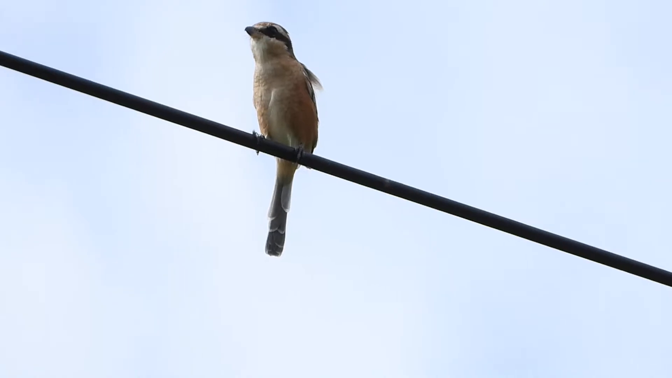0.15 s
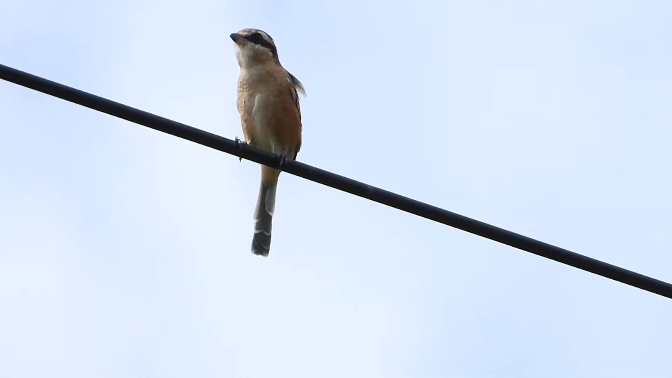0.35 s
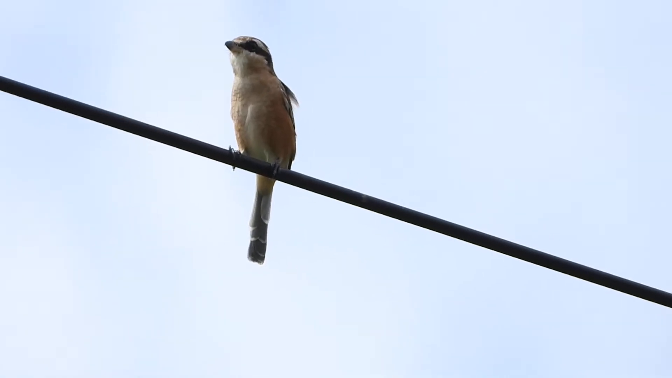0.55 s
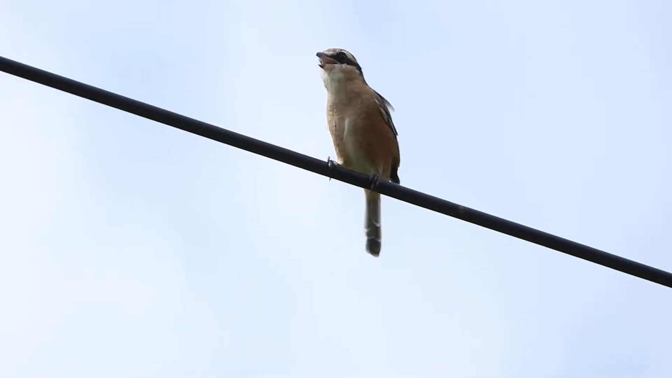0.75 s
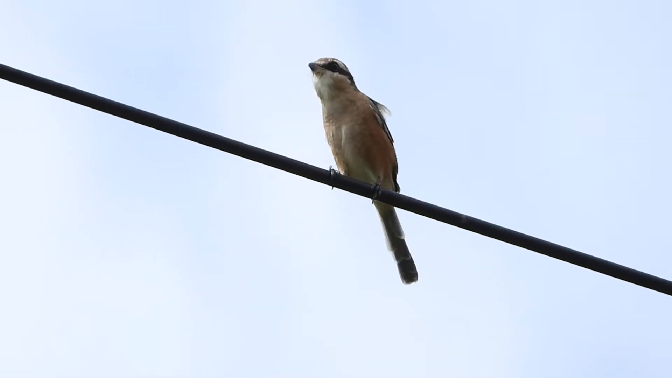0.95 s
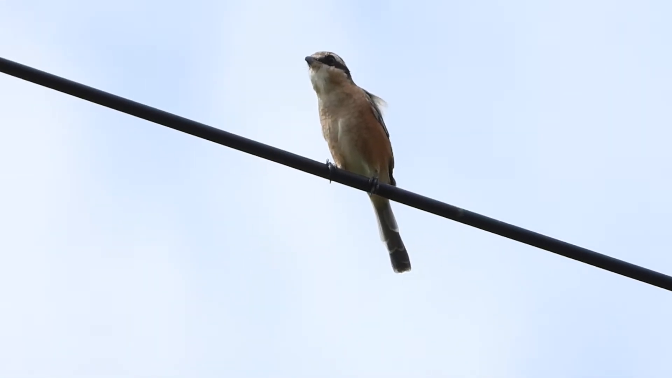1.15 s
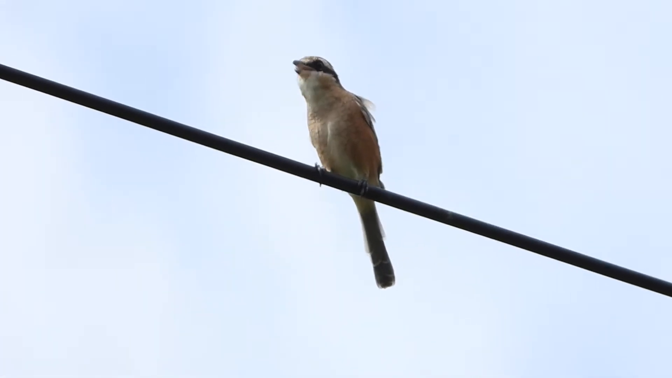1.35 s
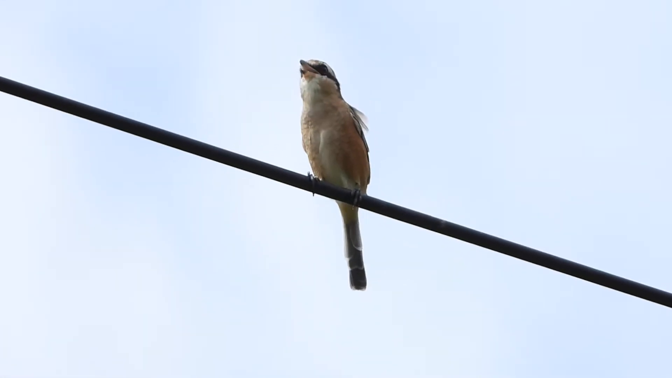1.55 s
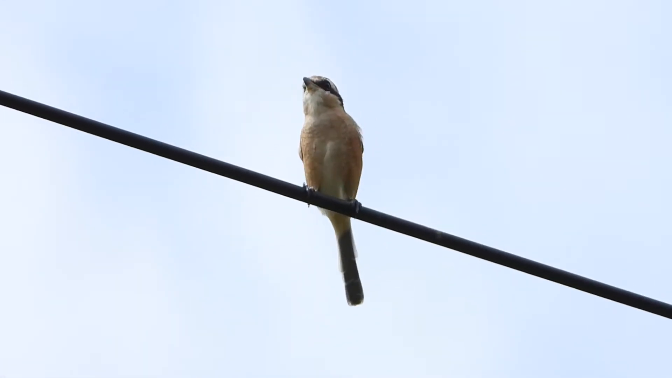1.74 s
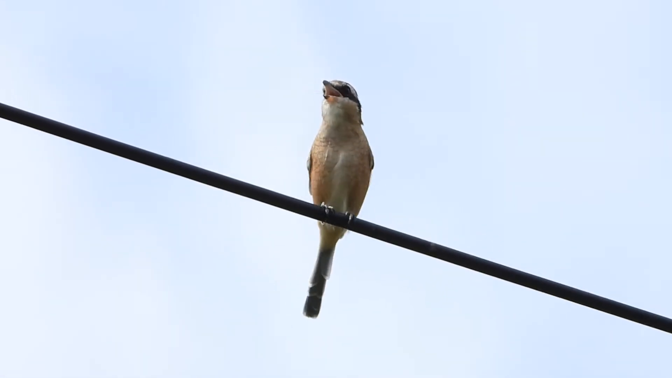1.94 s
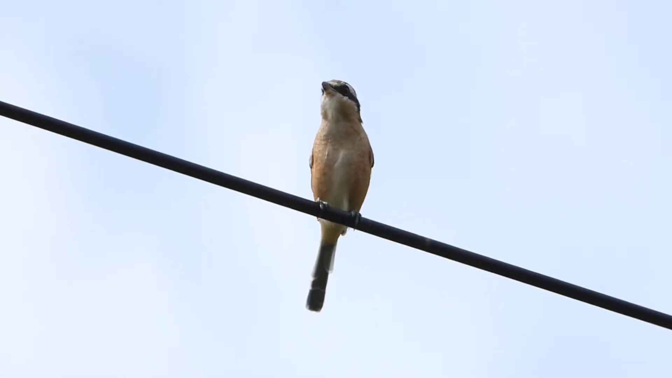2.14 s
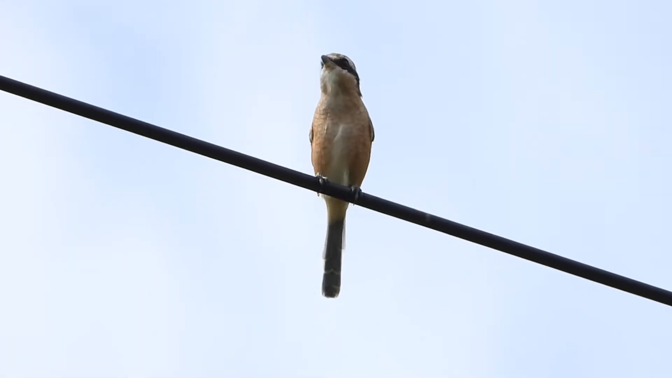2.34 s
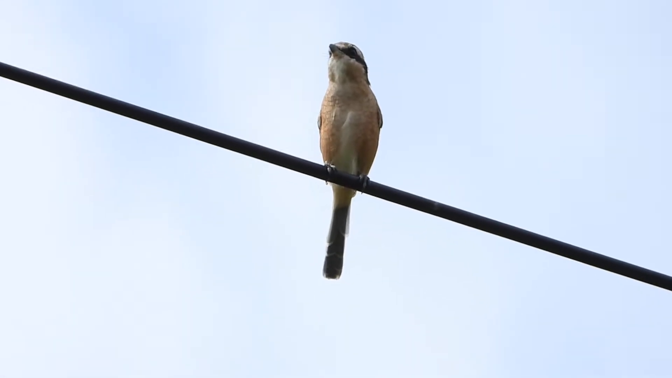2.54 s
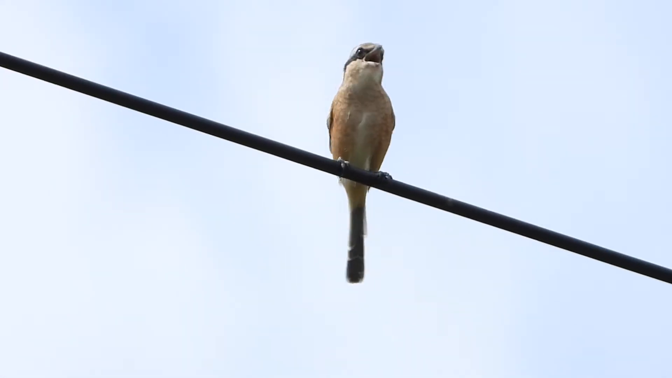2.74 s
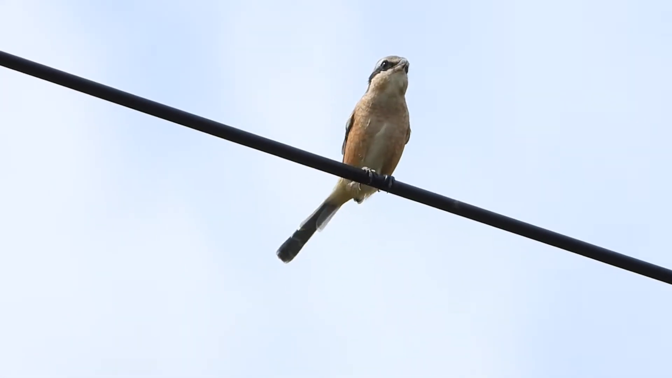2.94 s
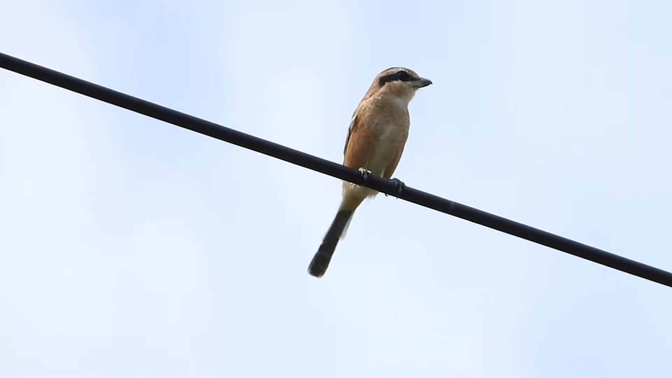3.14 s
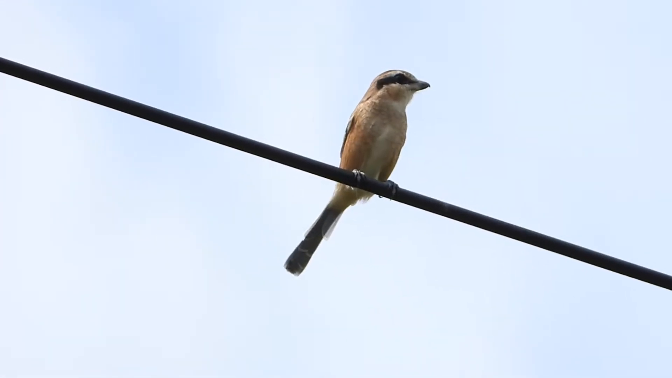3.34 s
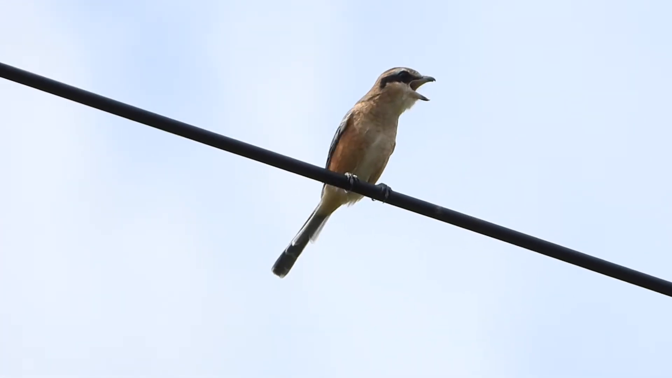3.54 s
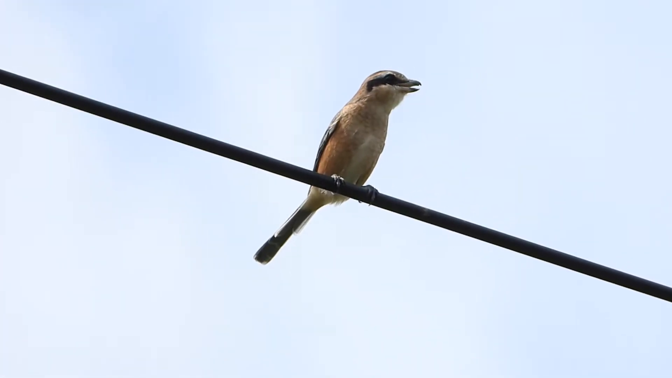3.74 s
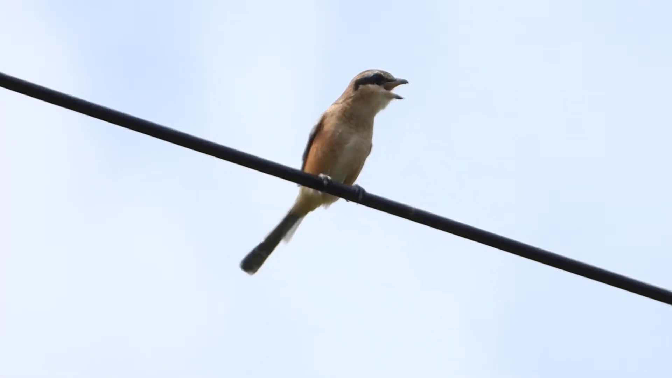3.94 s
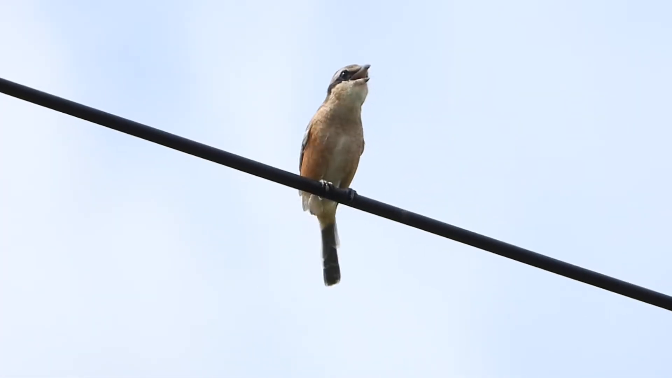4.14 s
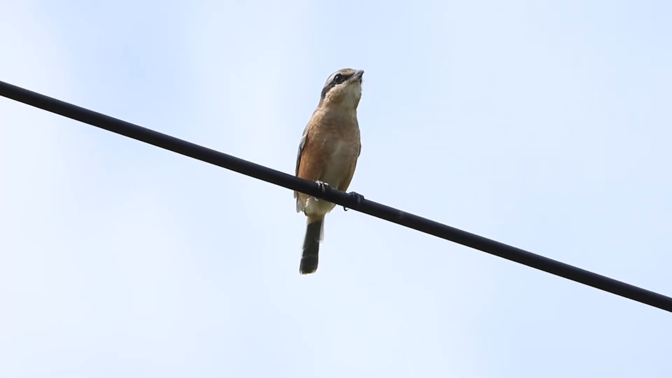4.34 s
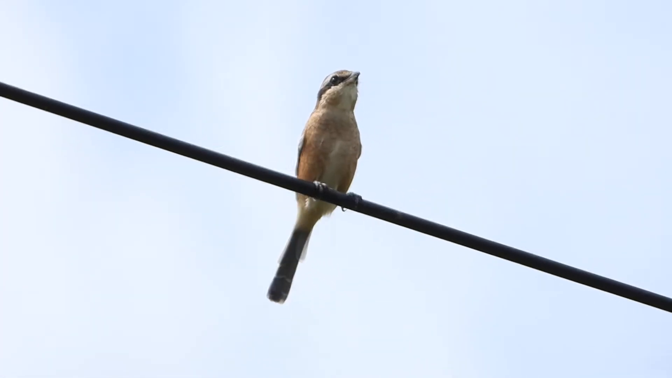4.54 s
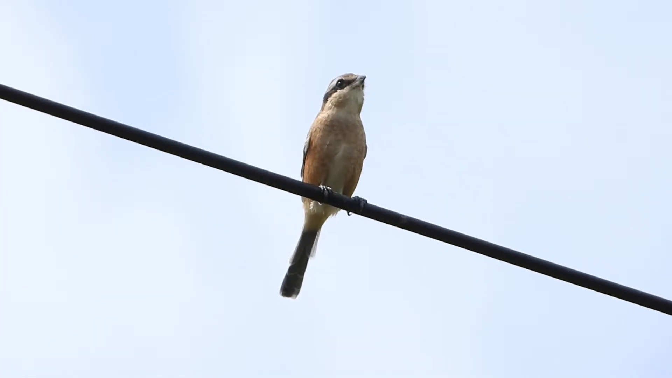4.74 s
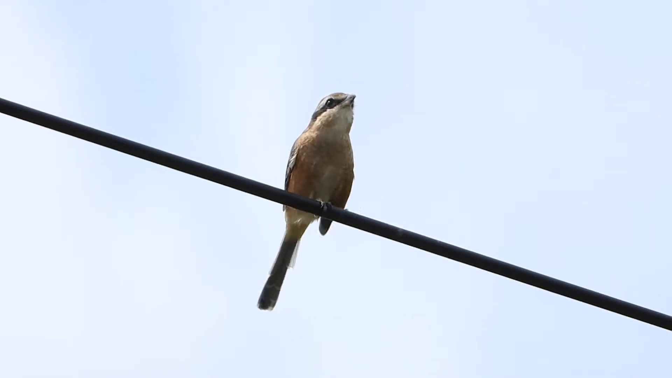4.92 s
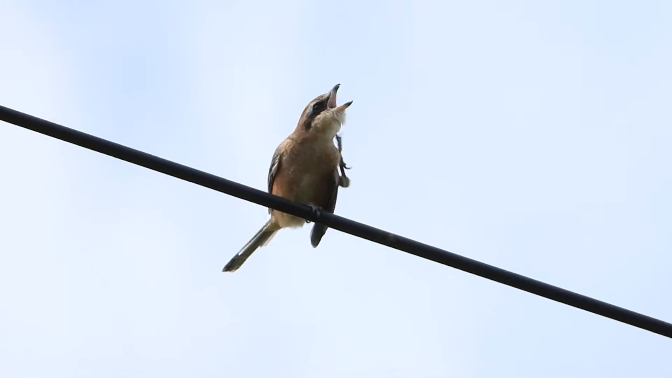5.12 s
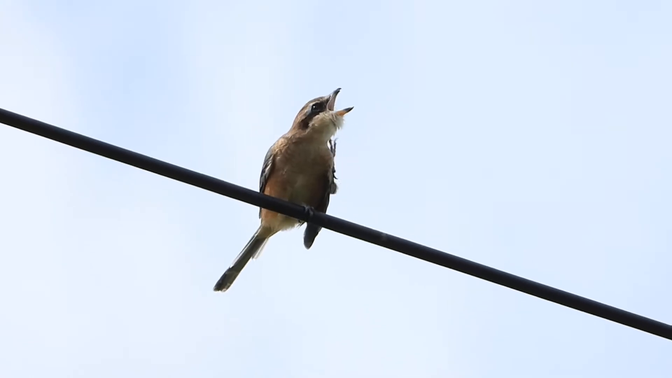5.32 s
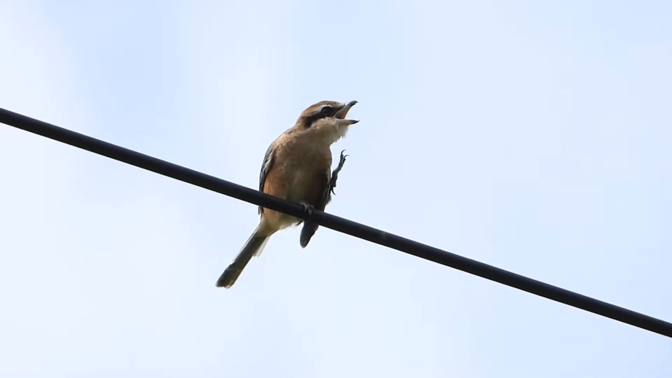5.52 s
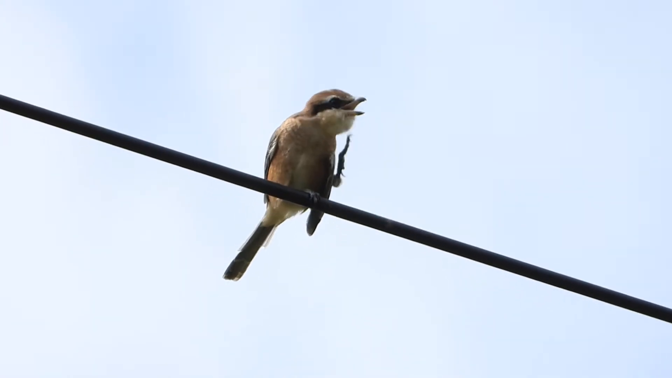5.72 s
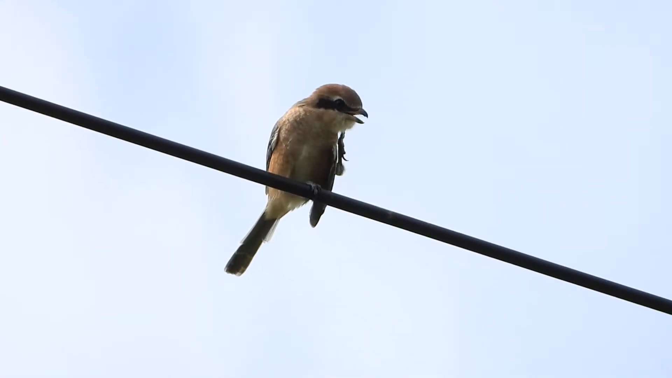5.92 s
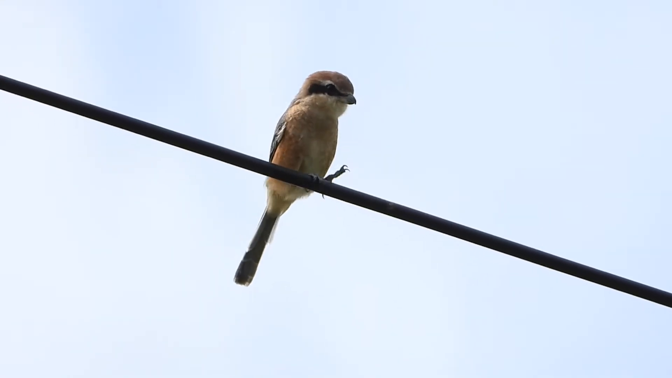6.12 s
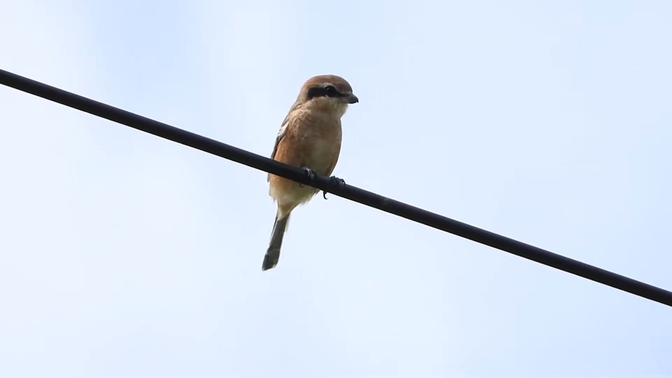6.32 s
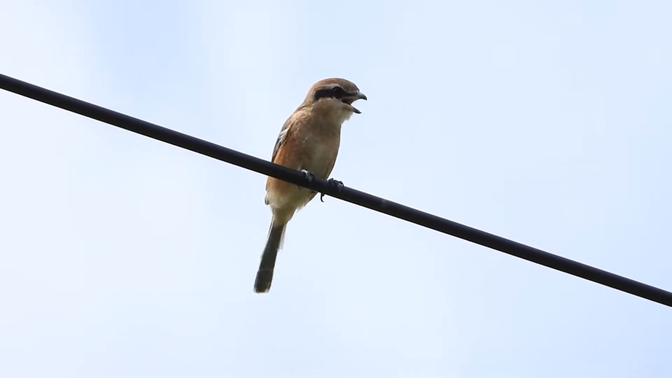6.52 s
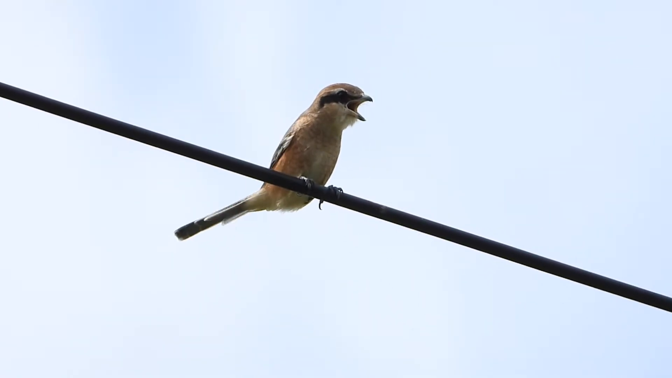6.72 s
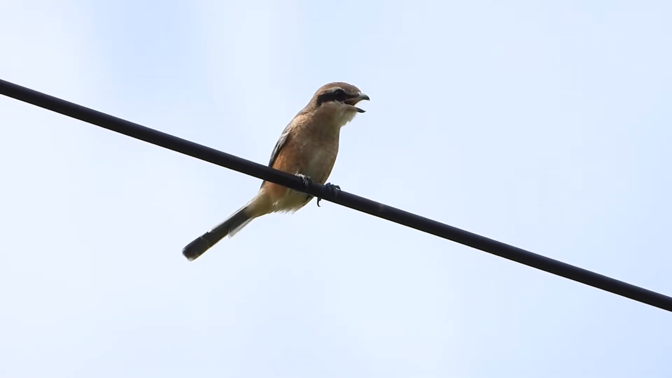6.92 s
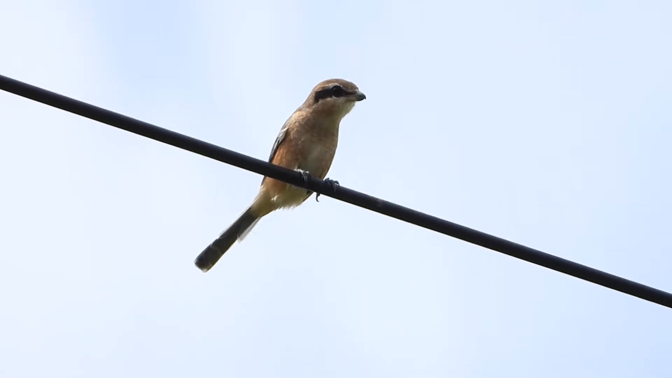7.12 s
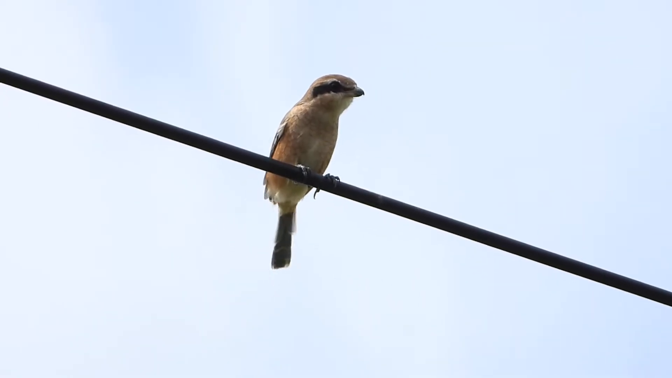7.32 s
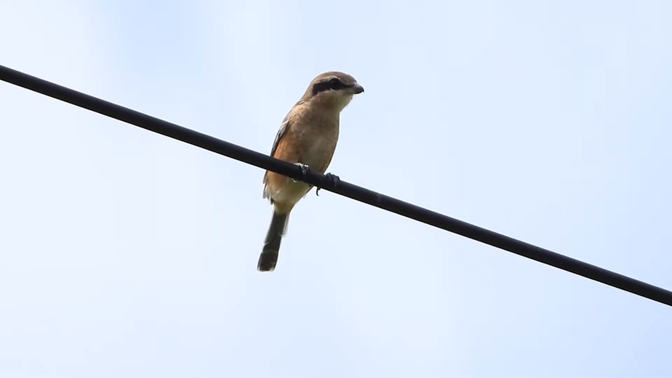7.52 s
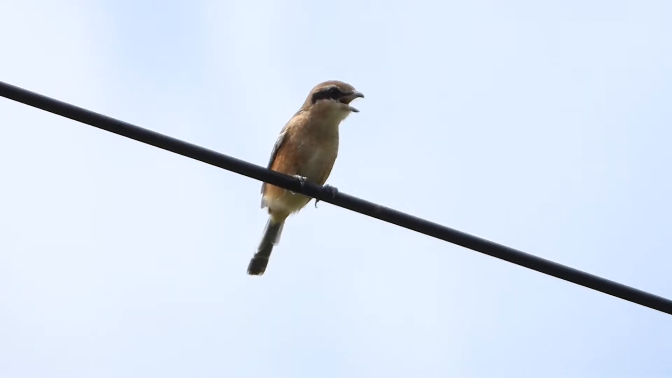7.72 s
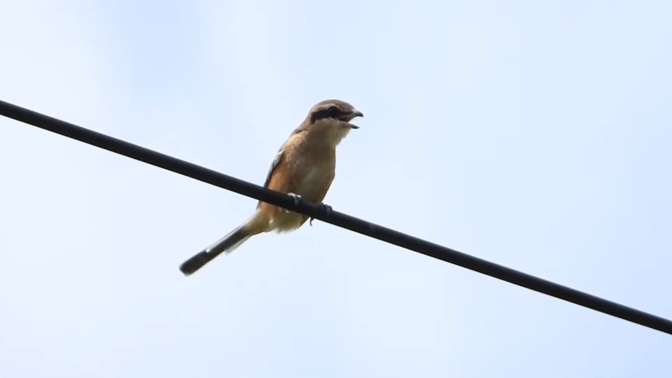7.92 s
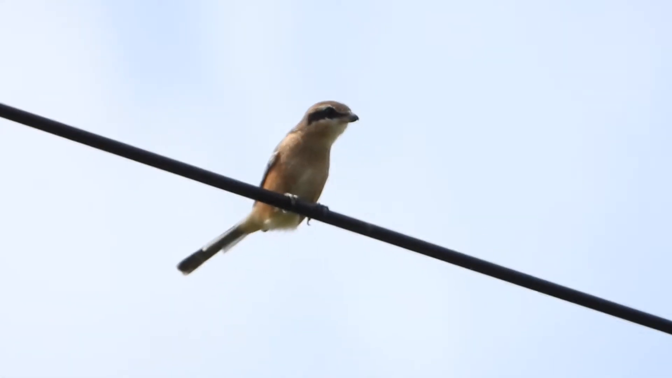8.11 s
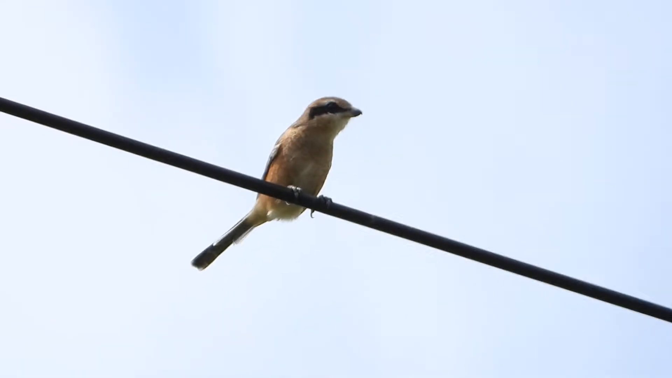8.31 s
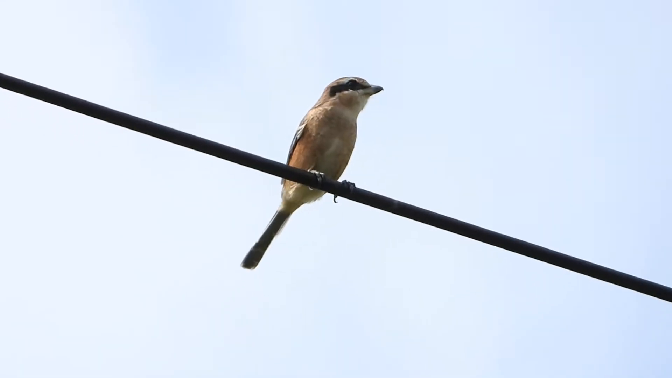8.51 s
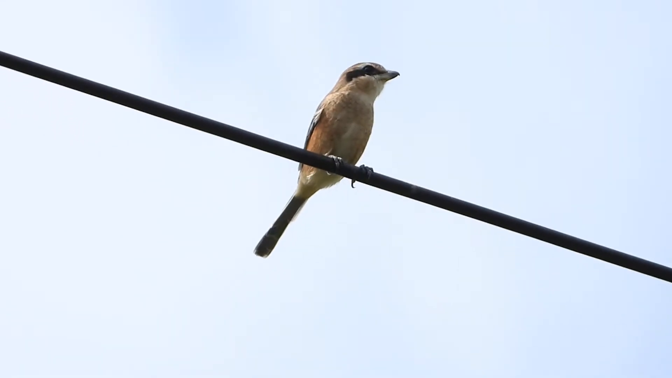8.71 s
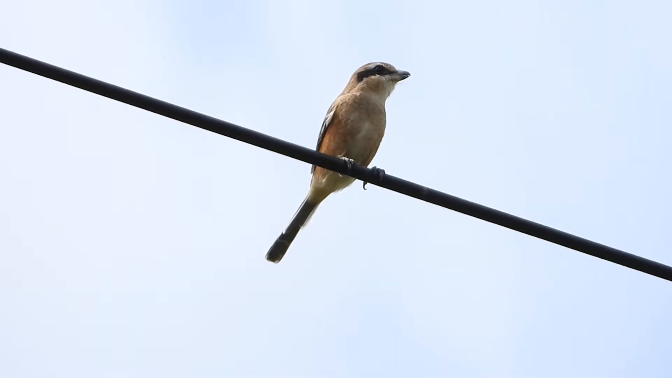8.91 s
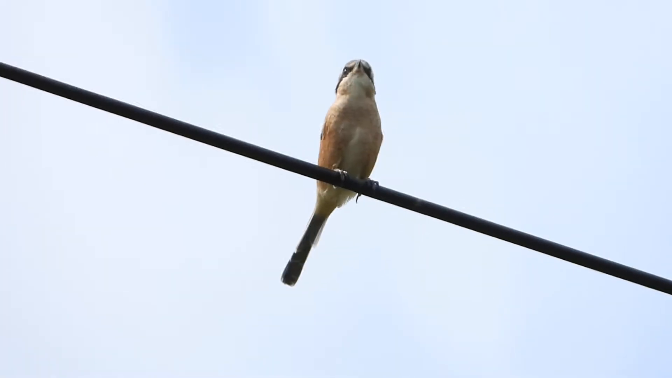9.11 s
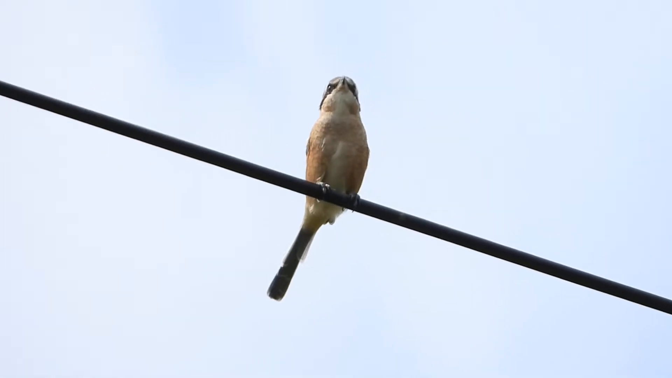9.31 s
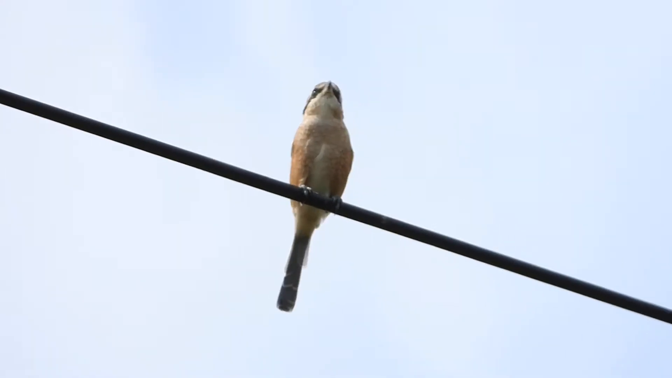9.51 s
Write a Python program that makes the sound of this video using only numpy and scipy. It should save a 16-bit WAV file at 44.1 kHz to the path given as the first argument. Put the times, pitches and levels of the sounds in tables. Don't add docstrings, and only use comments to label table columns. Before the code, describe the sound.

Stereo outdoor roadside ambience with a constant high cicada buzz and soft far-off traffic and motor hum. After faint hoots from another bird, a single shrike calls sparsely: short fluttering whines and piercing, downward chips, sometimes doubled or in a fast burst, with scattered reflections. Low wind rumble comes and goes around the microphone, with one stronger puff past eight seconds.

```python
import sys
import numpy as np
from scipy import signal
from scipy.fft import rfft, irfft, next_fast_len
from scipy.io import wavfile
from scipy.ndimage import uniform_filter1d

SR = 44100
rng = np.random.default_rng(int(sys.argv[2]) if len(sys.argv) > 2 else 0)


def pcm_store(signal):
    levels = np.round(np.clip(np.atleast_2d(signal), -1, 1) * 32767)
    wavfile.write(sys.argv[1], SR, levels.astype(np.int16).T)


def voltage_ratio(decibels):
    exponent = np.asarray(decibels, float) / 20
    return 10 ** exponent


N = 421596
TIME = np.arange(N) / SR
LR = np.array([[1], [-1]])


def level(x, db):
    return x * voltage_ratio(db) / np.sqrt(np.mean(x ** 2))


def on_log(table, hz):
    knots_hz, db = np.transpose(table)
    return np.interp(np.log(hz), np.log(knots_hz), db)


def band(x, hz, width_hz, order=1):
    edges = [hz - width_hz / 2, min(hz + width_hz / 2, 0.49 * SR)]
    return signal.sosfilt(signal.butter(order, edges, "band", fs=SR, output="sos"), x)


def walk(rate):
    steps = rng.standard_normal(N // 100)
    return 1.2 * np.interp(TIME * rate, np.arange(len(steps)), steps)


def pan(db):
    return voltage_ratio(LR * db / 2)


def add(out, s, x):
    i = int(s * SR)
    out[i:i + len(x)] += x


# f/Hz, side minus mid level/dB
WIDTH = [(60, -14), (110, -14), (200, -8.5), (380, -7.5), (700, -11), (1290, -9), (2380, -6.5), (4400, -3),
         (8120, -5), (15000, -1)]


def distant(spectrum, flicker_db, flicker_rate):
    size = next_fast_len(N)
    hz = np.maximum(np.fft.rfftfreq(size, 1 / SR), 1)
    low_hz, high_hz = spectrum[0][0], spectrum[-1][0]
    colour = voltage_ratio(on_log(spectrum, hz)) * (hz > low_hz) * (hz < high_hz)
    mid, side = rfft(rng.standard_normal((2, size))) * colour
    both = mid + LR * side * voltage_ratio(on_log(WIDTH, hz))
    octave = np.log2(hz / low_hz)
    out = 0
    for k in range(int(np.log2(high_hz / low_hz)) + 2):
        share = np.cos(np.pi / 2 * np.clip(octave - k, -1, 1)) ** 2
        out = out + irfft(both * share)[:, :N] * voltage_ratio(flicker_db * walk(flicker_rate))
    return level(out, 0)


# f/Hz, level/dB per Hz
TRAFFIC = [(59, -53), (100, -29), (184, -8.5), (402, -6.5), (449, -3.5), (729, -0.5), (1200, -1.5),
           (1920, -5.5), (3070, -9), (3880, -11.5), (4200, -7.5), (5460, -7.5), (9240, -120)]


def traffic():
    return distant(TRAFFIC, 1.92, 9)


# f/Hz, level/dB
MOTOR_HUMS = [(197, -71.5), (300, -68), (365, -66), (435, -64), (520, -66), (600, -60.5), (710, -59.5),
              (830, -59.5), (960, -61.5), (1150, -62.5), (1400, -61.5), (1700, -70)]


def motors():
    out = 0
    for hz, db in MOTOR_HUMS:
        waver = 1 + 0.04 * walk(1.2) + 0.01 * walk(30)
        turn = 2 * np.pi * np.cumsum(hz * waver) / SR
        out = out + voltage_ratio(db - 2.0 + 11.9 * np.tanh(1.22 * walk(19))) * np.sin(turn)
    return out


# t/s, half length t/s, level/dB
GUSTS = [(1.6, .9, -77), (2.7, 0.071, -80), (3.2, .25, -80), (3.83, 0.29, -70), (4.97, .2, -79),
         (5.75, .5, -67.5), (7.49, .25, -79), (8.06, 0.43, -65.5), (8.7, .15, -73), (9.1, .2, -73),
         (9.3, .12, -64), (9.56, .2, -69)]


def wind():
    start_s, rise_s, hold_s, fall_s = 8.17, 0.069, 0.32, 0.098
    knots = start_s + np.cumsum([0, rise_s, hold_s / 2, hold_s / 2, fall_s])
    swell = np.interp(TIME, knots, [0, 1, np.sqrt(0.91), 1, 0]) ** 2
    lumps = band(rng.standard_normal(N), 507, 310, order=2) * voltage_ratio(1.8 * walk(30))
    puff = level(lumps, -37.5 - 3.5) * swell
    calm_db, drop_db = -85, 16
    gusts = voltage_ratio(calm_db)
    for s, half_s, db in GUSTS:
        gusts = gusts + voltage_ratio(db - drop_db * np.abs(TIME - s) / half_s)
    rumble = band(rng.standard_normal((2, N)), 122, 88, order=2) * voltage_ratio(4.1 * walk(9))
    return puff + level(rumble, 2.7) * gusts


# t/s, peak level/dB
TICKS = [
    (0.375, -31),
]


def ticks():
    out = np.zeros(N)
    i = np.arange(90)
    for s, db in TICKS:
        add(out, s, voltage_ratio(db + 9) * rng.standard_normal(90) * np.exp(-i / 25))
    return band(out, 3000, 3600, order=2)


# f/Hz, level/dB per Hz
CHORUS = [(2240, -19), (3800, -23), (4080, -14.5), (4660, -2.5), (5620, -2.5), (6810, -7), (8490, -15.5),
          (11500, -23), (14300, -34.5), (15300, -39)]
# drum clicks f/Hz, body f/Hz, body width f/Hz, throb f/Hz, level/dB, left minus right level/dB
CICADAS = [(383.4, 5730, 470, 16.2, -10.5, 2.5), (389, 5280, 1090, 15.1, -10, 7.5),
           (394.3, 6350, 1180, 17.5, -11.5, -8.5)]


def cicadas():
    out = level(distant(CHORUS, 0.87, 16), -0.94)
    for rate, hz, width_hz, throb_hz, db, side_db in CICADAS:
        beat = np.floor(np.cumsum(rate * (1 + 0.04 * walk(300))) / SR)
        clicks = np.diff(beat, prepend=0) * voltage_ratio(2.7 * rng.standard_normal(N))
        throb = np.sin(2 * np.pi * throb_hz * TIME + walk(1))
        swell_db = 3 * throb + 3 * walk(0.818)
        buzz = band(clicks, hz, width_hz, order=2) * voltage_ratio(swell_db)
        out = out + pan(side_db) * level(buzz, db)
    return out


# t/s, length t/s, top f/Hz, rms level/dB
HOOTS = [
    (0.216, 0.082, 1084, -55.5),
    (0.596, 0.072, 1114, -41),
    (1.001, .067, 1110, -39.5),
]


def hoots():
    out = np.zeros(N)
    rise_s, end_s = 0.037, 0.03
    for s, length, top_hz, db in HOOTS:
        t = np.arange(0, length + end_s, 1 / SR)
        knots = [0, rise_s, length]
        hz = top_hz * np.interp(t, knots, [1 - 0.127, 1, 1 - 0.039])
        turn = 2 * np.pi * np.cumsum(hz) / SR
        swell_db = np.interp(t, knots + [length + 0.005, length + end_s], [-12, 0, -1, -15, -19])
        unsteady_db = 2.0 * walk(58)[:len(t)]
        add(out, s, np.sqrt(2) * voltage_ratio(db + swell_db + unsteady_db) * np.sin(turn))
    return out


# delay t/s, level/dB, smear t/s, left minus right level/dB
ECHOES = [
    (.008, -18, 0.00092, 28),
    (0.035, -17, 0.0059, -8),
    (0.046, -14.5, 0.008, -2),
    (.062, -22, 0.024, -7),
]


def echoes(x):
    t = np.arange(int(0.5 * SR)) / SR
    trees_db, trees_t60_s = -7, 0.34
    fade = np.exp(-np.log(1000) * t / trees_t60_s) * np.clip(t / 0.022, 0, 1)
    scatter = rng.standard_normal((2, len(t))) * fade
    response = voltage_ratio(trees_db) * scatter / np.sqrt(np.sum(scatter[0] ** 2))
    for delay, db, smear, side_db in ECHOES:
        blur = np.exp(-np.clip((t - delay) / smear, 0, 50)) * (t >= delay)
        facets = rng.standard_normal(len(t)) * blur
        response = response + voltage_ratio(db) * pan(side_db) * facets / np.sqrt(np.sum(facets ** 2))
    returned = band(x, 5680, 5040, order=2) + voltage_ratio(8) * band(x, 9300, 3400, order=3)
    rustle_db = 3 * np.tanh([walk(90), walk(90)])
    return signal.fftconvolve(returned[None], response, axes=1)[:, :N] * voltage_ratio(rustle_db - 1.0)


# t/s, top f/Hz, held t/s, slide to the break t/s, peak level/dB
CHIPS = [
    (2.06, 3080, .004, 0.0051, -13),
    (3.638, 3140, 0.0037, 0.0078, -11.5),
    (3.72, 3085, 0.0065, 0.0032, -13),
    (4.133, 3020, .005, .0035, -13),
    (4.231, 3050, 0.0058, 0.0045, -11.5),
]
BRISK_CHIPS = [
    (6.685, 2760, 0.0053, 0.0022, -18.5),
    (6.765, 2940, 0.0049, 0.0031, -13.5),
    (6.854, 3055, .0065, .002, -12),
    (6.98, 2745, 0.0046, 0.0053, -14.5),
    (7.9, 3033, .006, 0.0046, -13.5),
    (7.982, 3030, 0.0041, .0095, -13),
]
# f/Hz, second partial level/dB, third against it level/dB
CHIP_VOICE = [(1400, -32.5, 7), (1740, -15, -6), (1870, -20, 9), (2260, -6, -9.5), (2510, -2, -16),
              (2720, -2.5, -29), (3000, -11, -26), (3080, -9, -20)]
# t/s, top f/Hz, length t/s, curve of the fall, level/dB
WHINES = [
    (0.953, 2494, 0.04, 6.3, -20.5),
    (1.566, 2804, 0.043, 1.5, -18.5),
    (2.929, 2830, .043, 1.15, -19.5),
    (9.112, 2640, 0.039, 2.5, -20),
]
# f/Hz, second partial level/dB, third against it level/dB
WHINE_VOICE = [(1500, -6, -2), (1790, 1, -17.5), (1760, 1, -9), (1960, -6, -8), (2070, 2, -10.5),
               (2440, -1, -10.5), (2590, 3, -29), (2820, -2, -16)]


def contours():
    shoulder_hz, jump_s = 2740, 0.002494
    break_hz, knee_hz, end_hz = 2463, 1819, 1363
    scoop, trail_s = 0.019, 0.0073
    for rows, fall_s in ((CHIPS, 0.0065), (BRISK_CHIPS, 0.00472)):
        for s, top_hz, held, slide, db in rows:
            times = s + np.cumsum([0, held, jump_s, slide, fall_s, trail_s])
            start_hz, peak_hz = top_hz * (1 - scoop), top_hz * (1 + scoop / 2)
            yield times, [start_hz, peak_hz, shoulder_hz, break_hz, knee_hz, end_hz], db, CHIP_VOICE, False
    slack_hz, droop_hz, droop_s = 1724, 160, 0.0028
    u = np.linspace(0, 1, num=20)
    for s, top_hz, length, curve, db in WHINES:
        sink = slack_hz + (top_hz - slack_hz) * (1 - u) ** curve
        times = np.append(s + u * length, s + length + droop_s)
        yield times, np.append(sink, slack_hz - droop_hz), db, WHINE_VOICE, True


# f/Hz, first level/dB, fourth level/dB
THROAT = [(1500, -4.5, -11), (1660, -14.5, -17), (1850, -18.5, -45), (2320, -16.5, -23), (2340, -39, -28.5),
          (3000, -10.5, -30), (3260, -7, -45)]


def beak_opening(drawn_out):
    from_hz, to_hz, peak_db, length_s = 8400, 4400, -29, 0.005
    sweep = np.linspace(from_hz, to_hz, int(length_s * SR))
    chirp = np.hanning(len(sweep)) * np.sin(2 * np.pi * np.cumsum(sweep) / SR)
    return length_s, voltage_ratio(peak_db - 6.1 * drawn_out) * chirp


def shrike():
    out = np.zeros(N)
    rasp = 0.13 * level(band(rng.standard_normal(N), 1150, 1740), 0)
    breath = level(band(rng.standard_normal(N), 8300, 4400, order=4), -50)
    throat_hz, first_db, fourth_db = np.transpose(THROAT)
    for s, pitch, call_db, voice, drawn_out in contours():
        t = np.arange(s[0] - 0.0025, s[-1] + 0.0041, 1 / SR)
        since = t - s[0]
        hz = uniform_filter1d(np.interp(t, s, pitch), size=30)
        voice_hz, second_db, third_db = np.transpose(voice)
        second_db = call_db + np.interp(hz, voice_hz, second_db)
        third_db = np.interp(hz, voice_hz, third_db)
        depth = max(drawn_out, 0.3) * np.clip(since / 0.027, 0.3, 1)
        flutter = depth * np.sin(2 * np.pi * 222 * since)
        hz = hz * (1 + 0.052 * flutter)
        turn = 2 * np.pi * np.cumsum(hz) / SR
        carry_db = 3 * (1 - drawn_out) * np.clip((2463 - hz) / 500, 0, 1)
        low_db = np.interp(hz, throat_hz, first_db) + carry_db
        partials = (low_db, 0, third_db, np.interp(hz, throat_hz, fourth_db))
        tone = sum(voltage_ratio(db) * np.sin((k + 1) * turn + k) for k, db in enumerate(partials))
        now = (t * SR).astype(int)
        tired = voltage_ratio(-105 * drawn_out * since)
        tone = (tone * (1 + rasp[now]) + breath[now]) * tired
        edge = np.clip(np.minimum((t - t[0]) / 0.0039, (t[-1] - t) / 0.002), 0, 1)
        pulse = 1.5 + 0.55 * np.roll(flutter, 30)
        add(out, t[0], tone * voltage_ratio(second_db) * pulse * edge)
        opening_s, chirp = beak_opening(drawn_out)
        add(out, s[0] - opening_s + 0.002, chirp)
    out = band(out, 5860, 9600, order=3)
    bounce = voltage_ratio(-16) * np.roll(out, int(0.0031 * SR))
    return out + bounce


# t/s, cicadas level/dB, traffic level/dB
AIR = [(0.45, -43, -48), (1.08, -39, -46), (2.3, -40, -47), (4.4, -39, -46.5), (4.74, -37.5, -46),
       (5.47, -39.5, -47.5), (6.05, -37.5, -47.5), (6.8, -39.5, -45.5), (7.45, -40.5, -47),
       (7.911, -40, -43.5), (8.3, -41.5, -47.5), (9.56, -38.5, -45.5)]


def scene():
    s, chorus_db, traffic_db = np.transpose(AIR)
    around = traffic() * voltage_ratio(np.interp(TIME, s, traffic_db) + 1.5)
    around = around + cicadas() * voltage_ratio(np.interp(TIME, s, chorus_db))
    bird = shrike() * voltage_ratio(-1.38)
    background = around * pan(-0.65) + motors() + wind() + ticks() + hoots()
    return background + echoes(bird) + bird * pan(-0.99)


def low_pass(x):
    return signal.sosfilt(signal.butter(12, 15610, fs=SR, output="sos"), x)


def record(dry):
    open_s, top_hz = 0.157, 15400
    fade = np.clip((TIME - open_s) / 0.027 + 1, 0, 1) ** 3
    mix = signal.sosfilt(signal.ellip(8, 0.2, 50, top_hz, fs=SR, output="sos"), dry * fade)
    return low_pass(mix)


dry = scene()
out = record(dry)
pcm_store(out)
```